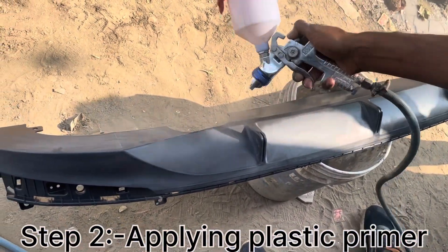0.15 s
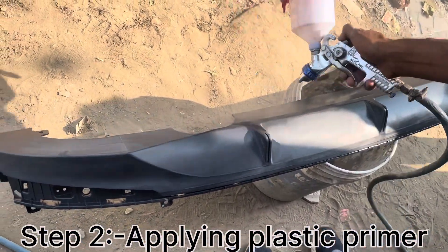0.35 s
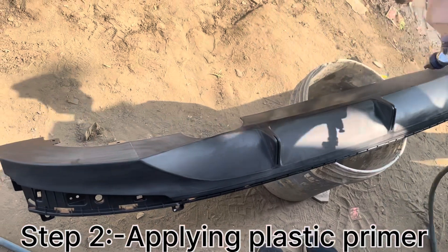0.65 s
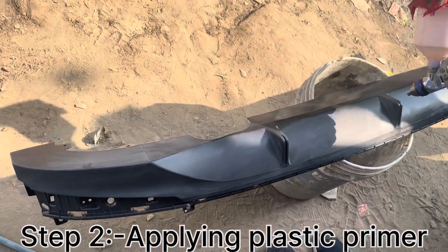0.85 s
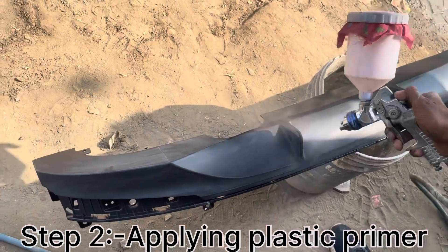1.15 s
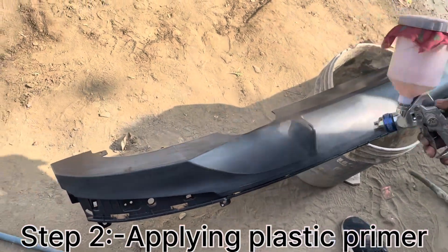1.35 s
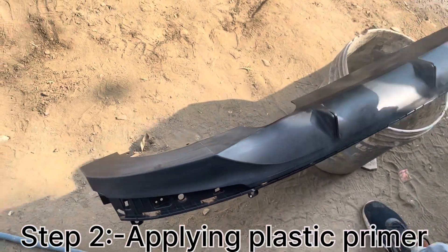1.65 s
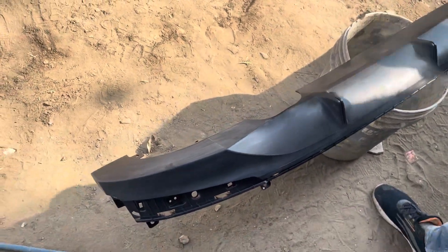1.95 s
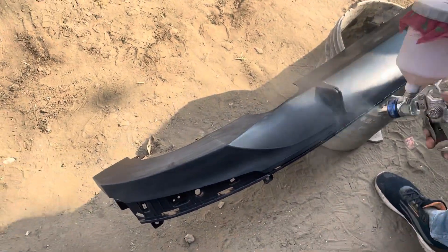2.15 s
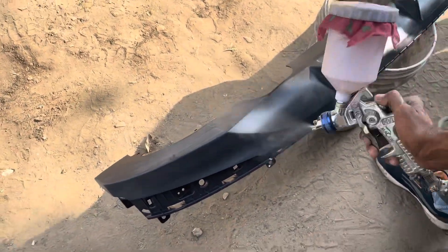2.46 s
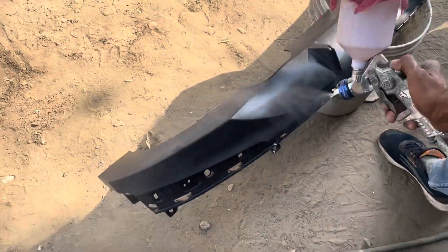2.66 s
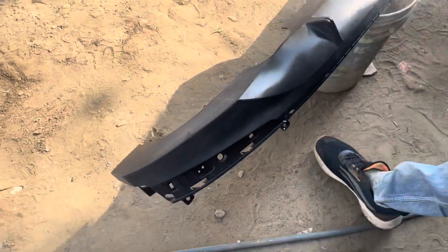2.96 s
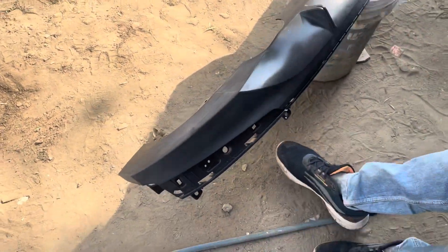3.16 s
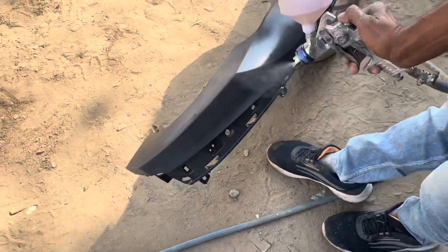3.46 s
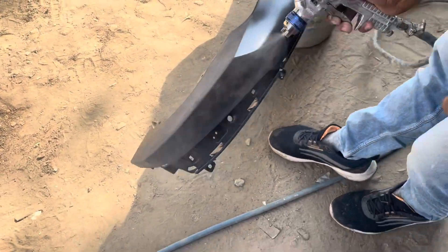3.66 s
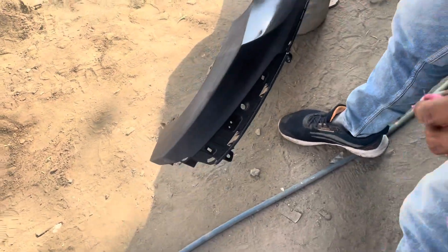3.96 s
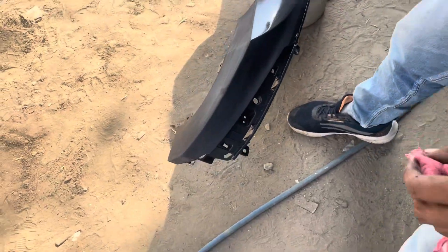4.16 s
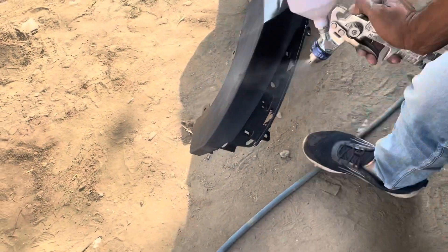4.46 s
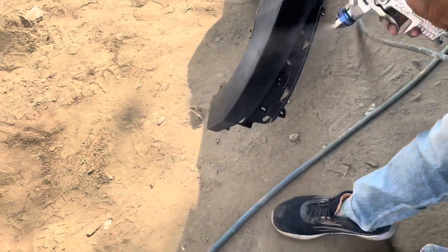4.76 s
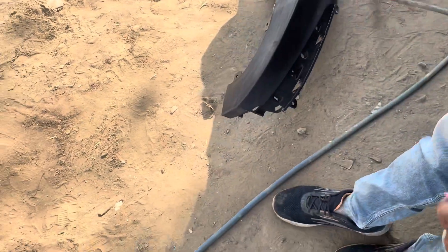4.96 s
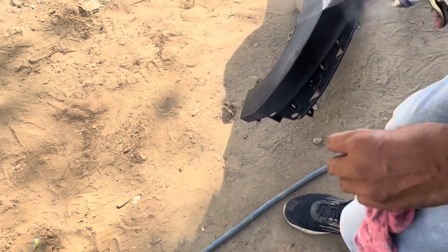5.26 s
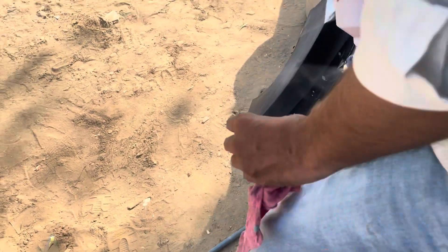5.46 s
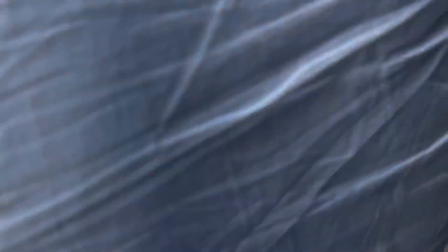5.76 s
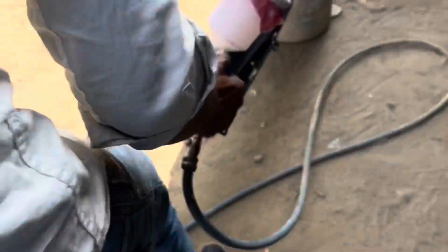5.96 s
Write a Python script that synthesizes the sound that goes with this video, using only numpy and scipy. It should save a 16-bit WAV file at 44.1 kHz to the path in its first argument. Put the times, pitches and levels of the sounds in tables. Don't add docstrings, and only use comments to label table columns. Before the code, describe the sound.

A close air spray gun hisses steadily in sweeping strokes outdoors while a nearby diesel engine revs up and settles; the hiss briefly drops out near the end.

```python
import sys
import numpy as np
from scipy import signal
from scipy.io import wavfile
from scipy.ndimage import uniform_filter1d

SR = 44100
rng = np.random.default_rng(int(sys.argv[2]) if len(sys.argv) > 2 else 0)


def to_wav(sig):
    pcm = np.clip(np.atleast_2d(sig), -1, 1) * 32767
    pcm = np.round(pcm).astype(np.int16)
    wavfile.write(sys.argv[1], SR, pcm.T)


def magnitude_from_level(level_db):
    exponent = np.asarray(level_db, float) / 20
    return 10 ** exponent


N = 269451
T = np.arange(N) / SR
HOP = 256


def resonance(x, hz, width):
    b, a = signal.iirpeak(hz, hz / width, fs=SR)
    return signal.lfilter(b, a, x)


def unit(x):
    return x / np.sqrt(np.mean(x ** 2))


def smooth_twice(x, size, axis=-1):
    return uniform_filter1d(uniform_filter1d(x, size, axis=axis), size, axis=axis)


def curve(rows, t=T):
    s, *columns = np.transpose(rows)
    return [np.interp(t, s, c) for c in columns]


def over_hz(rows, hz):
    f, *columns = np.transpose(rows)
    return [np.interp(np.log(hz + 1), np.log(f), c) for c in columns]


def swell(centre, length, t=T):
    return np.exp(-(2 * (t - centre) / length) ** 2)


def frames():
    return signal.stft(rng.standard_normal(N), SR, nperseg=4 * HOP, noverlap=3 * HOP)


def sound(z):
    return signal.istft(z, SR, nperseg=4 * HOP, noverlap=3 * HOP)[1][..., :N]


def patches(shape, bins, steps):
    field = smooth_twice(rng.standard_normal(shape), int(bins), axis=0)
    return unit(smooth_twice(field, int(steps), axis=1))


# start in seconds, nearness in dB, how squarely the jet hits the part in dB,
# how far the nozzle faces the phone in dB.
STROKES = [(0, -35.5, 2, -1.5), (.2, -34, 1, 0.5), (.55, -36.5, 1.5, -1.5), (.88, -33.5, -4.5, 0),
           (1.1, -35.5, 4, 0), (1.52, -34, -2, -3), (1.75, -37.5, -2, -1), (2.2, -36, 2.5, 0.5),
           (2.58, -33, -0.3, -3.5), (2.8, -35.5, 2, 1), (3.08, -39, 2, 1.5), (3.58, -32, -1, -3),
           (4.0, -37.5, -1, 1), (4.22, -39, 1, 3), (4.55, -36, 2, 2), (5.0, -37.5, -1.5, 1.5),
           (5.4, -40, 2.1, -0.9), (6.11, -38, -5, -3)]
BAND_CENTRES = [1160, 3860, 6140, 8700]
# frequency in Hz, level in dB per Hz.
NOZZLE_HISS = [(250, -9), (700, -8), (1150, -5.5), (1800, -5.5), (2800, -2.5), (4100, 0.5), (4700, 1),
               (6000, 1), (8200, 3.5), (9300, 0), (10600, -16.5), (12100, -9), (13700, -13.5),
               (15500, -8.5)]
# centre in seconds, length in seconds, frequency in Hz, lift in dB (negative dips).
HISS_PATCHES = [(0.16, 0.22, 4100, 1.5), (0.84, .15, 4500, 4.5), (1.37, 0.31, 3200, 2.5),
                (2.4995, .3, 4440, 2), (3.55, .35, 5800, 2.5), (3.55, 0.24, 3800, 2.5),
                (4.547, 0.46, 3950, 6), (1.07, .5, 4200, -2), (5.1, .5, 6500, 2.5), (1.5, .3, 5800, 1.5),
                (.5, .3, 2200, -2.5), (.1, .3, 3000, 2), (5.965, .03, 13500, 8), (5.3, 0.29, 4160, 1.5),
                (6.03, .12, 3740, 3.5)]
BODY_SHADE = (-21, -17.5, -23, -36)


def jet_level_db(hz, t, shape):
    core, hit, facing = curve(STROKES, t)
    splash = 0.82 + hit
    cap = -0.56 + 0.3 * hit + 0.45 * facing
    mist = -0.33 + facing
    bands = np.array([splash, cap, 0 * core, mist]) + np.array(BODY_SHADE)[:, None] * shade(t)
    place = np.interp(np.log(hz + 1), np.log(BAND_CENTRES), np.arange(4))
    share = np.clip(1 - np.abs(place[:, None] - np.arange(4)), 0, 1)
    db = share @ bands + over_hz(NOZZLE_HISS, hz)[0][:, None] + core
    hz = hz[:, None]
    db = db + 1.09 * patches(shape, 6.5, 40.5)
    db = db + 1.42 * (hz / 8000) * patches(shape, 77.0, 6.5)
    for centre, length, at, lift in HISS_PATCHES:
        db = db + lift * swell(centre, length, t) * swell(at, 1200, hz)
    return db


# start in seconds, extra path of the ground echo in ms,
# radians the left port leads where the phone body scatters, left minus right in dB.
GUN_SWEEP = [(0, 0.94, -2.5, 1.5), (.45, 0.92, 2.5, 3), (.8, 0.79, -1, 2.5), (1.1, 0.84, 4, 3.5),
             (1.4, 0.96, 1.3, 2.2), (1.8, 0.69, -0.5, 3), (2.2, 0.83, 1.5, 3), (2.6, 0.81, 1, 2.2),
             (3, 0.68, 1, 2.5), (3.25, 0.65, 1.5, 3.5), (3.5, 0.82, -2, 0.5), (3.9, 0.92, -4, 2),
             (4.15, .95, -4.5, 3), (4.5, 0.71, 0.5, 1.3), (4.9, 0.73, -4.5, 3.4), (5.3, 0.68, 0, 2),
             (5.6, 0.8, 0, 3), (6.11, 0.96, -3, 3)]
# frequency in Hz, radians the left port leads,
# share of unrelated sound from 0 to 1.
PORT_MATCH = [(300, -0.5, 0.05), (1170, -0.5, 0.03), (1960, 0, 0.11), (2880, -0.74, 0.27),
              (3900, -0.5, 0.03), (4980, 0.5, 0.7), (5570, 0.33, 0.06), (7450, -2.5, 0.17), (7655, -3, 0),
              (8210, -3, 0), (9600, -4.5, 0), (11300, -6.5, 0.12), (12200, -6.5, 0.16), (14440, -9.5, 0.01)]


def spray():
    hz, t, jet = frames()
    db = jet_level_db(hz, t, jet.shape)
    echo_ms, swing, pan_db = curve(GUN_SWEEP, t)
    lead, loose = (c[:, None] for c in over_hz(PORT_MATCH, hz))
    hz = hz[:, None]
    jet = jet * (1 + 0.24 * np.exp(-hz / 5000) * np.exp(-2e-3j * np.pi * hz * echo_ms))
    lead = lead + swing * np.exp(-((hz - 4840) / 440) ** 4)
    lead = lead + 0.46 * (hz < 7000) * patches(jet.shape, 9.5, 45.5)
    tilt_db = 1.37 * pan_db * np.clip(1 - (hz / 7800) ** 2, 0, 1) * np.clip(hz / 2200, 0, 1)
    loose = np.clip(loose, 0, 1)
    ports = []
    for way in (1, -1):
        shared = np.sqrt(1 - loose) * jet * np.exp(.5j * way * lead)
        own = np.sqrt(loose) * frames()[2]
        ports.append(magnitude_from_level(db + 10 + way * tilt_db / 2) * (shared + own))
    return sound(np.array(ports) * (hz > 150))


def shade(t):
    from_s, behind_s, until_s = 5.42, 5.685, 5.935
    edge_s, clear_s = 0.035, 0.044
    early = np.array([.18, .25, .33, .36])[:, None]

    def ramp(start, length):
        return np.clip((t - start) / length, 0, 1)

    creep = early * ramp(from_s, behind_s - from_s)
    closing = creep + (1 - early) * ramp(behind_s, edge_s)
    return closing * (1 - ramp(until_s, clear_s))


# frequency in Hz, width in Hz, level in dB.
YARD_WAVES = [(66, 25, 2.5), (90.5, 14.7, 8), (113.2, 12.2, 4), (141.5, 14.6, 1.5), (181, 16, 5),
              (205.2, 15, 0.8), (244.9, 20, -7), (303.5, 44, -16)]


def yard_db(f):
    power = sum(magnitude_from_level(2 * db) / (1 + (2 * (f - at) / width) ** 2) ** 2 for at, width, db in YARD_WAVES)
    return 10 * np.log10(power)


# start in seconds, firing rate in Hz, load in dB.
ENGINE_REVS = [(0, 24.65, -52.5), (.45, 23.15, -59), (1.0, 24.8, -50.5), (1.3, 24.41, -58),
               (1.9, 25.32, -52), (2.7, 24.71, -53.5), (3.5, 24.48, -54), (3.88, 25.6, -50),
               (4.0, 27.76, -53.5), (4.11, 30.46, -42), (4.374, 45.4, -33), (4.68, 59.26, -33.5),
               (4.8, 60.07, -35.5), (5.156, 60.7, -32), (5.25, 54.87, -37), (5.5, 41.1, -41),
               (5.79, 32.54, -46), (6.11, 35.93, -49.5)]
STRONG_OVERTONES = (-0.5, 0.7, -1.5, -3.5)
# frequency in Hz, level in dB.
EXHAUST_COLOUR = [(30, -28), (60, -5.5), (150, -7), (220, -2.5), (290, -17), (430, -12.5), (600, -25)]
# centre in seconds, length in seconds, overtone number, lift in dB (negative fades).
OVERTONE_SWELLS = [(.12, .15, 3, 13.5), (0.19, .45, 6, 15), (.84, .2, 3, 5), (1.1, .2, 3, 10), (1.7, .7, 10, 15),
                   (2.1, 0.89, 3, 11), (2.13, 0.5, 4, 12.5), (1.93, 0.53, 5, 12), (2.99, 1.3, 5, 19),
                   (2.9, 0.59, 4, 6), (3.0, .8, 8, 8), (3.26, 0.73, 9, 9), (3.1, .9, 7, 5), (3.6, .6, 6, 7),
                   (3.88, 0.51, 5, 12.5), (3.9, 0.31, 7, 8), (4.14, .12, 3, 6), (5.33, 0.12, 2, 5.5),
                   (5.53, .14, 2, 7), (5.3, .1, 5, 8), (5.8, .3, 2, -5), (5.33, 0.13, 4, 4.5), (4.9, .6, 1, 5),
                   (4.7, 0.09, 2, 3.5), (.85, 0.39, 10, 10.5), (5.52, .15, 5, 5), (5.752, .2, 6, 7),
                   (5.6, .2, 4, 6), (6.024, .2, 6, 8), (6.05, 0.16, 4, 9)]


def engine():
    hz, effort_db = curve(ENGINE_REVS)
    strong_db = np.array([effort_db + db + yard_db(k * hz) for k, db in enumerate(STRONG_OVERTONES, 2)])
    strong_db = 20 * np.log10(uniform_filter1d(magnitude_from_level(strong_db), size=1800))
    uneven = unit(smooth_twice(rng.standard_normal((2, N)), 900)) * 25 / hz
    angle = 2 * np.pi * np.cumsum(hz * (1 + 0.0039 * uneven[0])) / SR
    load_db = uniform_filter1d(np.mean(strong_db, axis=0), size=6000)
    rasp_db = 15 * np.clip(1 - hz / 60, 0, 1) ** 0.38
    levels = []
    for k in range(1, 13):
        if 2 <= k <= 5:
            levels.append(strong_db[k - 2] - 1)
        else:
            levels.append(load_db + over_hz(EXHAUST_COLOUR, k * hz)[0] - rasp_db * (k * hz > 290))
    for centre, length, k, lift in OVERTONE_SWELLS:
        levels[int(round(k)) - 1] += lift * swell(centre, length)
    tone = sum(magnitude_from_level(db) * np.cos((k + 1) * angle - 0.2477 * k ** 2) for k, db in enumerate(levels))
    pan_db = -.3 - 4.5 * np.clip((hz - 40) / 18, 0, 1)
    return np.sqrt(2) * tone * magnitude_from_level(1.44 * uneven[1] + np.array([pan_db, -pan_db]) / 2)


# pitch in Hz, start in seconds, end in seconds, level in dB.
WHISTLES = [
    (4378, 5.55, 5.72, -55),
    (4378, 5.71, 5.945, -59.5),
    (4540, 5.84, 5.925, -61),
    (4700, 5.78, 5.85, -69),
]


def leak():
    waver = unit(smooth_twice(rng.standard_normal(N), 900))
    out = np.zeros(N)
    for hz, start, end, db in WHISTLES:
        gate = np.clip(np.minimum(T - start, end - T) / 0.014, 0, 1)
        angle = 2 * np.pi * np.cumsum(hz * (1 + 0.00205 * waver)) / SR
        out += gate * magnitude_from_level(db + 1.5 * waver) * np.sin(angle)
    return np.sqrt(2) * out


def scuff():
    start_s, attack_s, hold_s = 1.45, .06, .11
    t = np.clip(T - start_s, 0, None)
    grain_db = 1.4 * np.repeat(rng.exponential(size=N // 128 + 1), 128)[:N]
    grit = rng.standard_normal(N) * magnitude_from_level(grain_db)
    body = 4.0 * resonance(grit, 605, 50) * np.exp(-t / 0.087)
    body += 1.6 * resonance(grit, 370, 270) + 0.13 * resonance(grit, 987, 700)
    fade_db = 120 * np.clip(t - attack_s - hold_s, 0, None)
    port_db = np.array([[-12.], [0.]])
    return unit(body) * np.clip(t / attack_s, 0, 1) * magnitude_from_level(-34 - fade_db) * magnitude_from_level(port_db)


# start in seconds, peak in dB, pitch in Hz, seconds to fall by 60 dB.
HOLLOW_KNOCKS = [
    (.529, -31.5, 232, 0.095),
    (4.064, -24, 593, 0.023),
    (5.669, -29, 716, 0.014),
    (5.705, -34, 472, 0.033),
    (5.869, -41, 1000, 0.021),
]


def knocks():
    out = np.zeros(N)
    for s, db, hz, t60 in HOLLOW_KNOCKS:
        t = np.clip(T - s, 0, None)
        ring = np.sin(2 * np.pi * hz * t) + 0.5 * np.sin(2 * np.pi * 1.73 * hz * t)
        out += magnitude_from_level(db - 60 * t / max(t60, .01)) * ring * (1 - np.exp(-t / 0.00062))
    return out


# frequency in Hz, level in dB per Hz.
RUMBLE_COLOUR = [(25, -30), (40, -1), (70, 4.5), (130, 0), (240, -10), (400, -15.5), (800, -21),
                 (2000, -27.5), (5000, -32), (8000, -43)]
# centre in seconds, length in seconds, lift in dB.
WIND_GUSTS = [(.02, 0.27, 6.5), (1.02, .3, 5), (1.756, 1, 7), (3.2, 0.81, 2.5), (4.495, 0.94, 11.5),
              (5.501, 1.195, 7.5)]


def rumble():
    hz, t, mid = frames()
    db = over_hz(RUMBLE_COLOUR, hz)[0][:, None] + 1.8 * patches(mid.shape, 2.5, 25.5)
    side = np.clip(hz[:, None] / 600, .15, .7) * frames()[2]
    noise = unit(sound(magnitude_from_level(db) * np.array([mid + side, mid - side])))
    gust_db = sum(lift * swell(centre, length) for centre, length, lift in WIND_GUSTS)
    return noise * magnitude_from_level(-47 + gust_db)


def scene():
    return spray() + engine() + leak() + scuff() + knocks() + rumble()


def low_pass(x):
    return signal.sosfilt(signal.butter(12, 15900, fs=SR, output="sos"), x)


def record(dry):
    bass_cut = signal.butter(3, 44, "high", fs=SR, output="sos")
    mix = signal.sosfilt(bass_cut, dry)
    return low_pass(mix)


dry = scene()
out = record(dry)
to_wav(out)
```